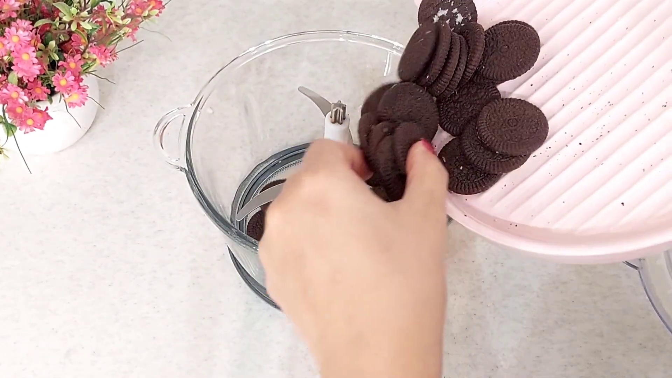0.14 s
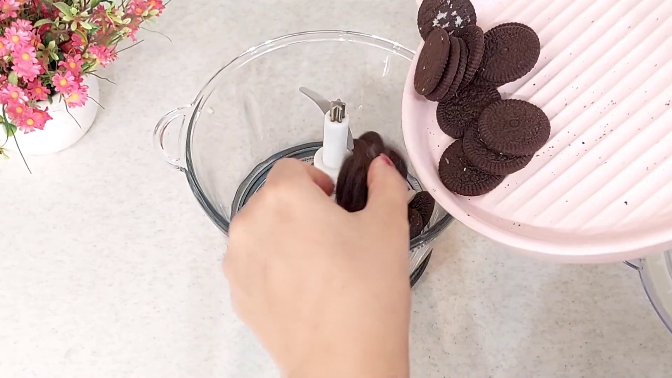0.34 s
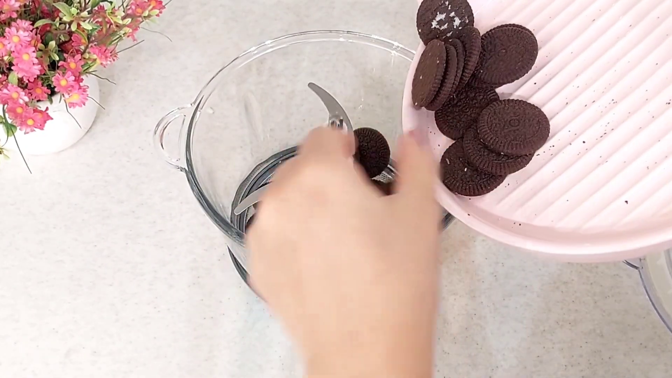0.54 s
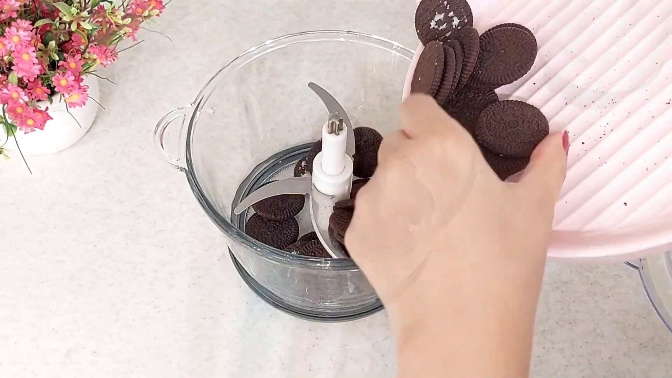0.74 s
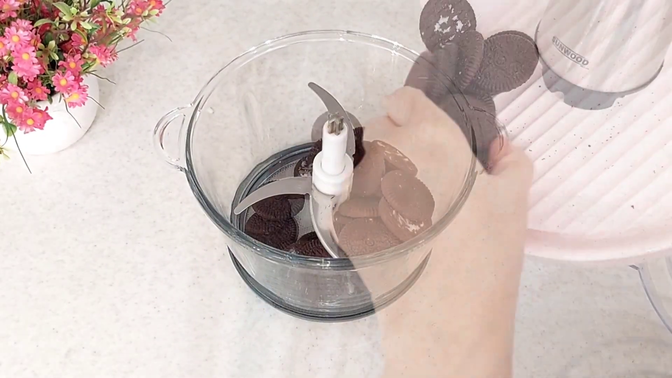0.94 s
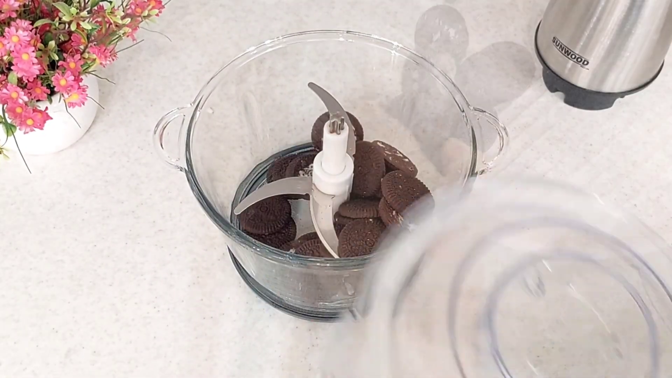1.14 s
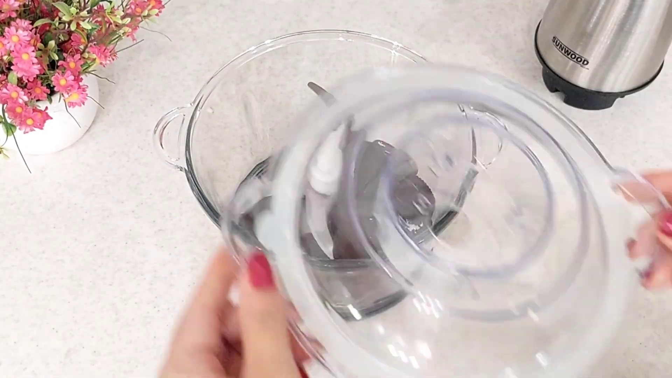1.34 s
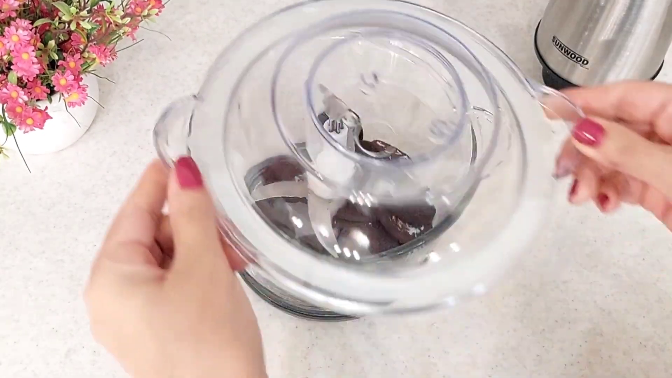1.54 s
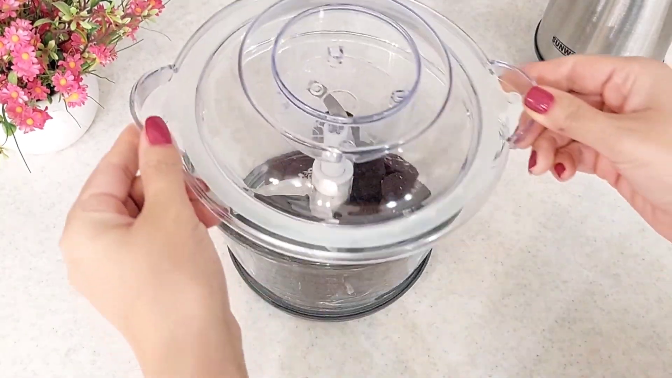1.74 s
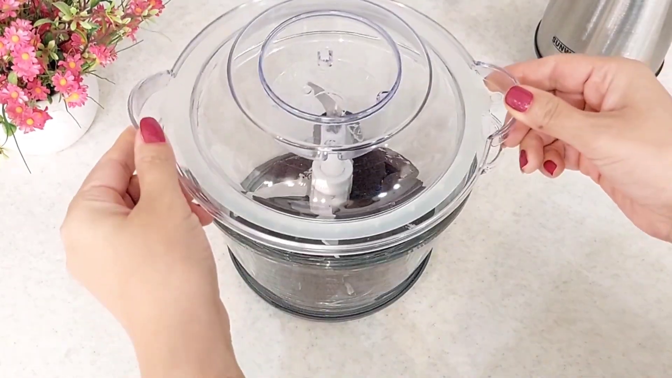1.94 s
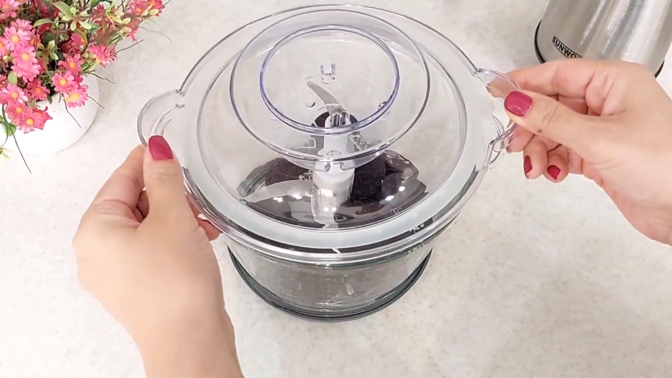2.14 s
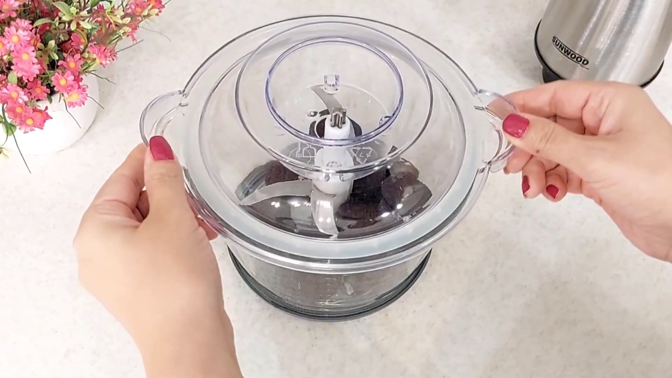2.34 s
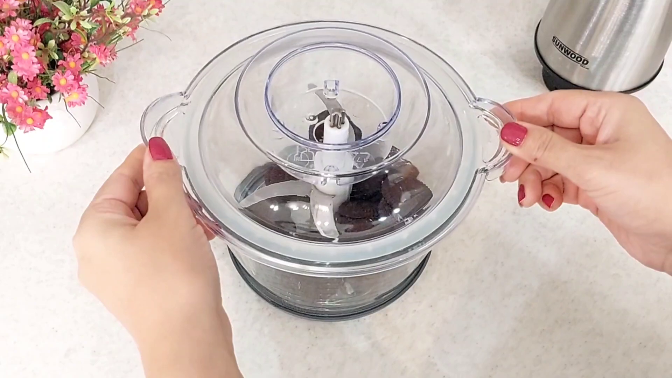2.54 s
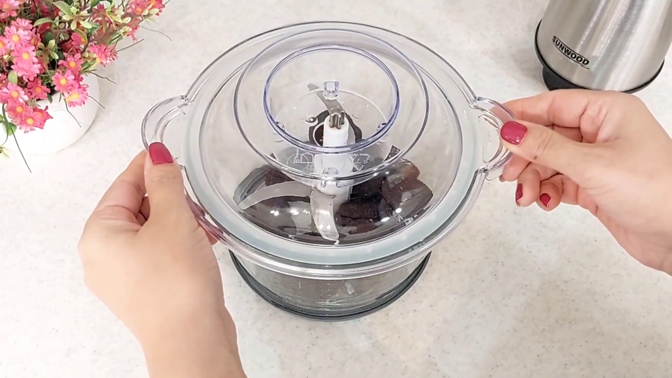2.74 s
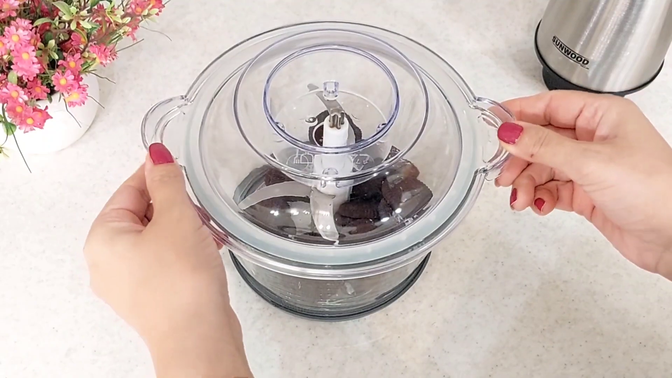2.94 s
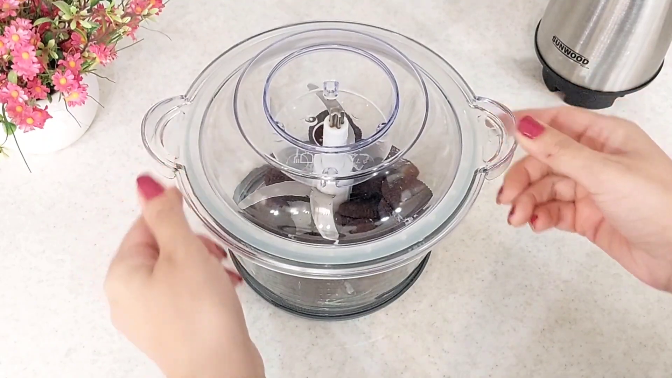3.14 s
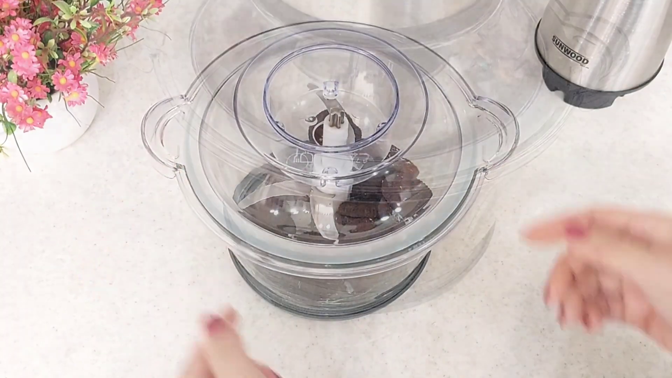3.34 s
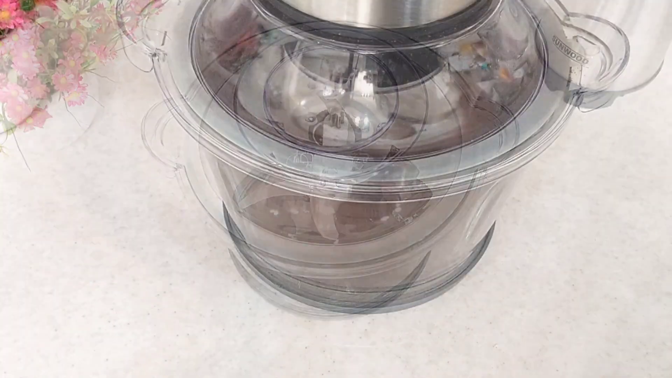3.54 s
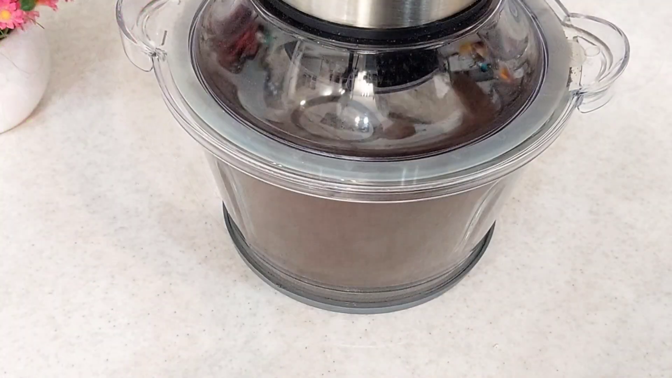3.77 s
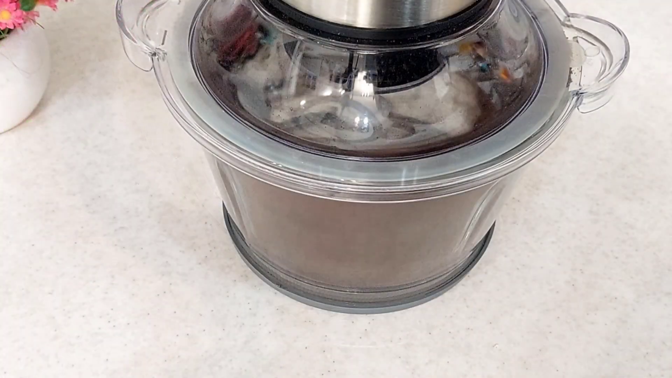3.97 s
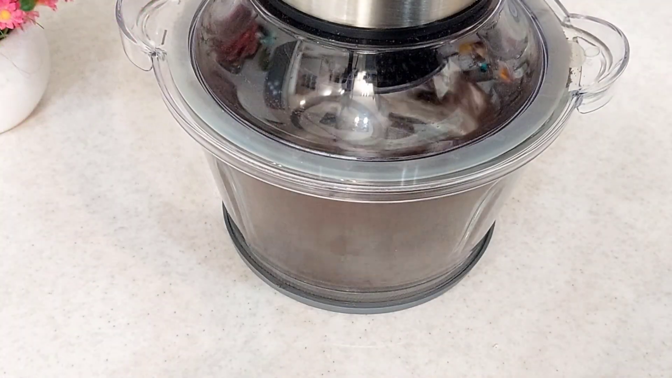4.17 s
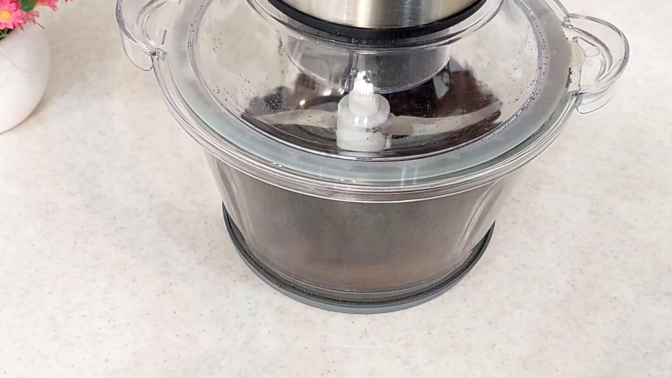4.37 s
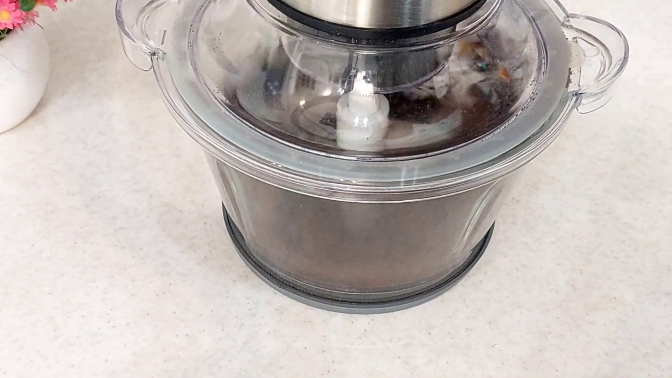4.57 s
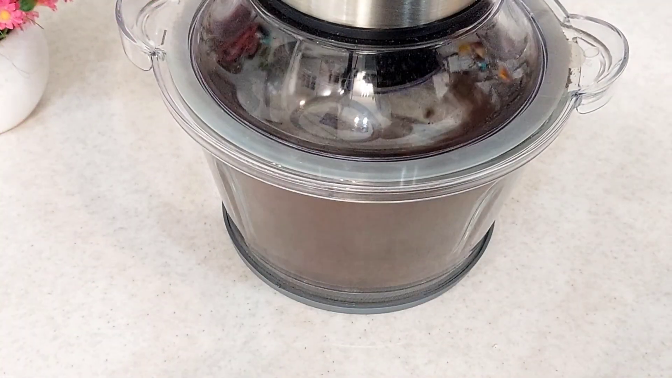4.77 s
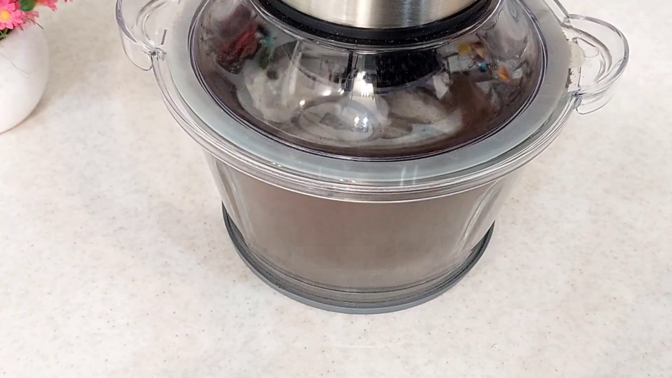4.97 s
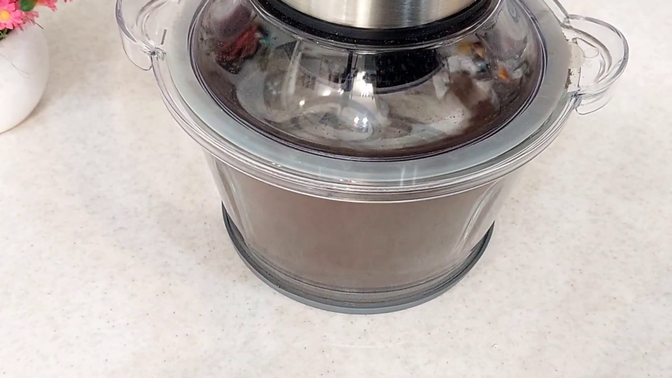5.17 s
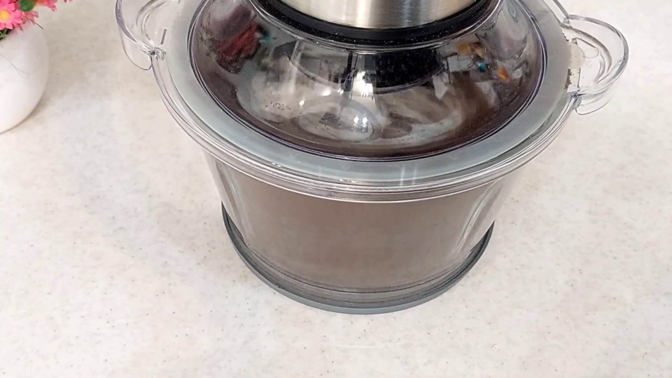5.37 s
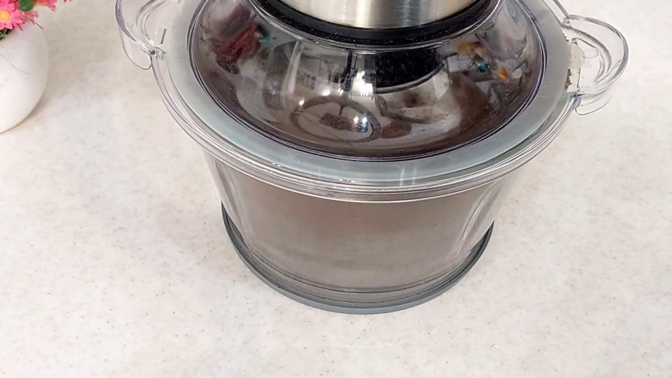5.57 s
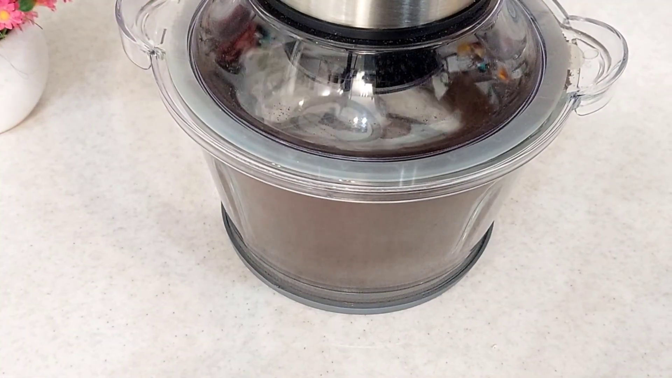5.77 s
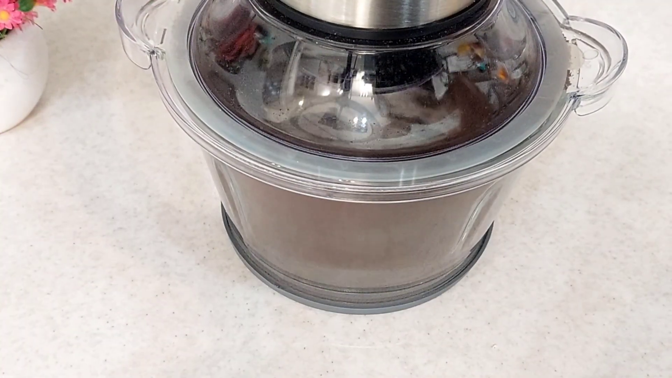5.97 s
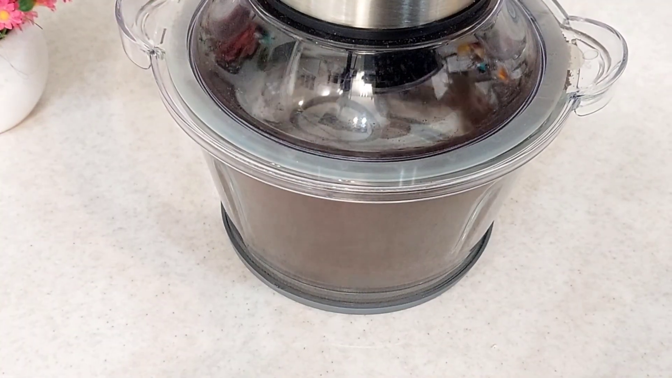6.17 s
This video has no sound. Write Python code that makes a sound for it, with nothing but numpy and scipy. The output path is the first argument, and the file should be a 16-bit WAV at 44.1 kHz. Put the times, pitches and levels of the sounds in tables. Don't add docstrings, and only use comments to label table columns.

```python
import sys
import numpy as np
from scipy import signal
from scipy.fft import rfft, irfft
from scipy.io import wavfile
from scipy.ndimage import uniform_filter1d

SR = 44100
rng = np.random.default_rng(int(sys.argv[2]) if len(sys.argv) > 2 else 0)


def undo_db(level):
    steps = np.asarray(level, float) / 20
    return 10 ** steps


def put_to_file(sound):
    columns = np.atleast_2d(sound).T
    safe = np.clip(columns, -1, 1)
    whole_steps = np.round(safe * 32767)
    wavfile.write(sys.argv[1], SR, whole_steps.astype(np.int16))


N = 273861

# (down [s], up [s], jolt [dB])
PRESSES = [
    (3.244, 4.12, -43),
    (4.586, 6.3, -34),
]


def evened(x):
    return x / np.sqrt(np.mean(x ** 2) + 1e-20)


def read(points, hz):
    f, value = np.transpose(points)
    return np.interp(np.log(hz + 1), np.log(f + 1), value)


def humps_db(modes, hz):
    power = sum(undo_db(db) ** 2 / (1 + (2 * (hz - f) / w) ** 2) ** 2 for f, w, db in modes)
    return 10 * np.log10(power)


def bells_db(modes, hz):
    return sum(db / (1 + (2 * (hz - f) / w) ** 2) for f, w, db in modes)


def onset(t, rise):
    return 1 - np.exp(-t / rise)


def add(mix, s, sound, pan_db):
    part = mix[:, round(s * SR):][:, :sound.shape[-1]]
    sides = undo_db(np.array([[pan_db / 2], [-pan_db / 2]]))
    part += (sides * sound)[:, :part.shape[1]]


def white():
    return rng.standard_normal((2, N))


def flicker(per_s, depth_db):
    slow = uniform_filter1d(rng.standard_normal(N), size=60)
    slow = signal.lfilter([1], [1, -np.exp(-2 * np.pi * per_s / SR)], slow)
    return undo_db(depth_db * evened(slow))


def grains(per_s, spread_db, wash):
    size = undo_db(spread_db * np.minimum(rng.exponential(1, N), 4))
    size = size * (rng.random(N) < per_s / SR)
    return (evened(size) + wash) * white()


def ports(pair, shape_db, size, patchy_db=0., bins=5, frames=8):
    # (frequency [Hz], coherence [0-1])
    likeness = [(60, 0.92), (150, 0.97), (300, 0.96), (640, 0.38), (1400, 0.48), (3100, 0.18), (7000, 0.14),
                (15000, 0.31)]
    # (frequency [Hz], phase [rad])
    lead = [(300, .1), (1400, 0.66), (2500, 2.3), (6600, 14), (13400, 22)]
    # (frequency [Hz], level [dB])
    tilt = [(60, 3.5), (300, -1.5), (1300, 0.5), (3000, 0), (9000, -1.5), (15000, 8)]
    hz, t, z = signal.stft(pair, SR, nperseg=size)
    same = np.clip(read(likeness, hz), -1, 1)[:, None]
    late = np.exp(1j * read(lead, hz))[:, None]
    z = np.array([z[0], same * late * z[0] + np.sqrt(1 - same ** 2) * z[1]])
    side_db = np.array([.5, -.5])[:, None] * read(tilt, hz)
    patches = uniform_filter1d(rng.standard_normal(z.shape[1:]), size=bins, axis=0)
    patches = evened(uniform_filter1d(patches, size=frames, axis=1))
    z *= undo_db((shape_db(hz) + side_db)[..., None] + patchy_db * patches)
    return evened(signal.istft(z, SR, nperseg=size)[1][:, :N])


def puff(t, hz, width, t60):
    b, a = signal.butter(1, np.clip([hz / width, hz * width], 50, 20000), "bandpass", fs=SR)
    noise = evened(signal.lfilter(b, a, rng.standard_normal((2, len(t)))))
    return noise * undo_db(-60 * t / t60)


def note(t, hz, t60, rough, twin=0.32):
    a, b = rng.random((2, 1, 1)) + .3 * rng.random((2, 2, 1))
    pair = np.sin(2 * np.pi * (hz * t + a)) + twin * np.sin(2 * np.pi * (1.025 * hz * t + b))
    return (1 - rough) * pair * undo_db(-60 * t / t60) + rough * puff(t, hz, 1.04, t60)


def kitchen_air():
    # (frequency [Hz], density [dB per Hz])
    air = [(15, -41.5), (25, -19), (108, 6.5), (150, -19.5), (196, -3.5), (258, -7.5), (366, -2),
           (468, -5.5), (897, -23), (1870, -22), (4800, -40), (7300, -32.5), (8400, -40), (15100, -38.5),
           (16300, -52.5)]
    # (frequency [Hz], rms level [dB])
    hum_lines = [(99.5, -85), (199, -71), (293, -79)]
    t = np.arange(N) / SR
    hum = 0
    for hz, db in hum_lines:
        tone = np.sin(2 * np.pi * (hz * t + rng.random()))
        hum = hum + np.sqrt(2) * undo_db(db) * tone * flicker(4, 2.)
    return undo_db(-64) * ports(white(), lambda hz: read(air, hz), size=2048) + hum


def strokes(column):
    # (time [s], hold [s], scuff level [dB], thud level [dB], t60 [s])
    slides = [(0.001, 0.0014, -45.5, -50.5, 0.15), (0.033, 0.37, -52, -53.5, 0.9),
              (0.333, 0.051, -45.5, -43.5, 0.45), (0.449, .005, -32, -35.5, 0.19),
              (0.504, .01, -39.5, -42, 0.3), (0.59, 0.057, -52, -52.5, 0.15),
              (0.685, .003, -44, -45.5, 0.29), (0.863, 0.2, -65, -80, .2), (1.375, 0.043, -59.5, -72, .1),
              (1.026, .005, -57, -62, 0.22), (1.144, .003, -49.5, -54.5, 0.74),
              (1.29, 0.11, -83, -65.5, .1), (1.598, 0.051, -79, -58.5, 0.28),
              (2.02, 0.019, -58, -49.5, 0.37), (2.236, .003, -87, -58.5, 0.77),
              (2.566, 0.028, -80, -59, 1.6), (2.98, .003, -75.5, -70, 0.25),
              (3.044, 0.14, -83.5, -72.5, .1)]
    rise_db_per_s = 1004
    t = np.arange(N) / SR
    power = 0
    for row in slides:
        since, hold, t60 = t - row[0], row[1], row[4]
        rise_db = rise_db_per_s * np.minimum(since, 0)
        fall_db = -60 * np.maximum(since - hold, 0) / t60
        power = power + undo_db(row[column] + rise_db + fall_db) ** 2
    return np.sqrt(power)


def handling():
    # (frequency [Hz], density [dB per Hz])
    scuff_spectrum = [(240, -36.5), (400, 4.5), (744, 3.5), (1220, -7), (1450, 2.5), (2010, -3.5),
                      (3920, -11.5), (4500, -8.5), (5260, -10.5), (8910, -24), (10400, -21), (15100, -21.5),
                      (16300, -40.5)]
    # (frequency [Hz], width [Hz], level [dB])
    rubbed = [(1705, 42, 4), (5260, 440, -6), (11500, 2400, -16.5)]
    # (frequency [Hz], density [dB per Hz])
    thud_spectrum = [(15, -42.5), (25, -18.5), (64, -10), (114, 5.5), (227, -5), (315, 4.5), (502, -3.5),
                     (677, -25.5), (741, -11.5), (900, -19), (1170, -48), (1980, -120)]
    # (time [s], peak [dB], frequency [Hz], t60 [s], rise [s])
    bumps = [
        (.452, -27, 112, 0.24, 0.0077),
        (0.57, -42, 79, 0.22, 0.0049),
        (1.6, -47, 31, 0.8, 0.043),
        (2.683, -33, 103, 0.16, 0.0076),
        (2.54, -49, 100, 0.31, 0.024),
    ]
    grit = grains(3000, 2.5, 1.2) * flicker(20, 1.5)
    scuff = ports(grit, lambda hz: read(scuff_spectrum, hz), size=512, patchy_db=3.)
    scuff += undo_db(-13.5) * ports(white(), lambda hz: humps_db(rubbed, hz), size=1024)
    thud = ports(white(), lambda hz: read(thud_spectrum, hz), size=2048)
    out = undo_db(-1.0) * scuff * strokes(column=2) + undo_db(1.5) * thud * strokes(column=3)
    t = np.arange(SR // 2) / SR
    for s, db, hz, t60, rise in bumps:
        add(out, s, undo_db(db - 60 * t / t60) * np.sin(2 * np.pi * hz * t) * onset(t, rise), 0)
    return out


def biscuits():
    # (time [s], peak [dB], low note [Hz], high note [Hz], t60 [s])
    tumble = [(0.027, -38.5, 1840, 5120, 0.075), (0.04, -33, 1744, 3260, 0.072),
              (0.132, -33.5, 2340, 5210, 0.044), (0.152, -36, 1506, 5310, 0.095),
              (0.195, -32, 3230, 5150, 0.036), (0.23, -40.5, 2300, 5000, 0.037),
              (0.272, -28.5, 2900, 3370, 0.084), (0.289, -30, 2640, 3590, 0.075),
              (0.323, -28, 1690, 5250, 0.026), (0.335, -17, 1510, 5270, 0.024),
              (0.358, -21.5, 2154, 3830, 0.064), (0.393, -25.5, 1380, 5050, 0.044),
              (0.427, -26, 1756, 5190, 0.053), (0.436, -21.5, 2930, 3860, 0.076),
              (0.454, -21.5, 1660, 3660, 0.011), (0.486, -29, 1673, 4070, 0.093),
              (0.51, -32.5, 1480, 4430, 0.06), (0.526, -33, 2300, 3700, 0.043),
              (0.547, -32.5, 1700, 3480, 0.055), (0.597, -38.5, 1860, 4600, 0.054),
              (0.617, -42, 1800, 3320, 0.052), (0.694, -37.5, 2400, 5400, 0.047)]
    # (time [s], peak [dB], low note [Hz], high note [Hz])
    strays = [(0.87, -55, 1640, 5300), (0.97, -55, 1610, 5200), (1.021, -46, 1630, 4490),
              (1.116, -37, 1480, 5260), (1.133, -30.5, 2220, 4730), (1.168, -42, 2410, 5330),
              (1.176, -37.5, 1680, 3360), (1.214, -38, 2460, 3840), (1.238, -42.5, 2190, 4540),
              (1.281, -43.5, 2870, 5400), (1.325, -46, 1430, 5230), (1.367, -46, 2290, 5240),
              (1.374, -44, 1700, 5240), (1.395, -49, 1660, 4750)]
    # (time [s], peak [dB])
    ticks = [(0.0416, -34), (0.131, -32.5), (0.196, -47), (0.272, -32), (.323, -34), (.335, -25),
             (.358, -24), (.394, -30), (.4263, -22), (0.4413, -18), (0.5475, -32), (0.5955, -35),
             (.6794, -38), (.6918, -42), (1.116, -48), (1.1325, -38), (1.214, -38), (1.324, -46),
             (1.874, -63), (4.109, -12), (4.6602, -25), (6.1188, -29)]
    # (time [s], peak [dB], frequency [Hz], t60 [s])
    rings = [(0.033, -46, 2000, 0.3), (0.28, -36.5, 1690, 0.19), (0.4, -55, 1600, 0.84),
             (0.48, -25, 3540, 0.061), (.5, -44, 4230, 0.082), (0.84, -60.5, 1660, 0.21),
             (1.028, -43, 1650, 0.056), (1.028, -47.5, 2250, 0.1), (1.029, -51, 3000, 0.08),
             (1.24, -48, 5600, 0.059), (1.24, -53, 3300, 0.11), (1.407, -49, 1700, 0.16),
             (1.405, -54, 2940, 0.15), (2.222, -39.5, 1940, 0.069), (2.2212, -38, 457, 0.074),
             (2.572, -70.5, 1900, 0.69), (2.572, -61, 1300, 0.093), (0.092, -57, 1400, .5),
             (0.601, -51, 1650, 0.48), (.93, -65, 1675, .4), (3.08, -66, 2030, 0.23),
             (3.258, -53, 5620, 0.11), (4.443, -61, 7000, 0.043), (4.463, -72, 4100, 0.028),
             (4.512, -68, 5620, 0.063), (1.116, -39, 5100, 0.046), (.131, -43, 4300, 0.075),
             (.195, -38, 5150, 0.13), (.335, -18, 5100, 0.034), (0.45, -27.5, 6800, 0.071),
             (2.2, -57, 3050, 0.25), (2.1, -60, 1920, .3), (2.1, -63, 3300, 0.2),
             (.323, -34.5, 12800, 0.028), (.274, -44, 6500, .08), (.03, -46, 5200, .15),
             (.15, -46, 5300, .15), (4.04, -32, 1500, .08), (4.065, -28.5, 1380, .08),
             (2.225, -60, 2700, .1), (2.225, -56, 903, 0.15)]
    stray_t60, tick_t60 = 0.033, .003
    out, t = np.zeros((2, N)), np.arange(4500) / SR
    for s, db, low_hz, high_hz, t60 in tumble + [row + (stray_t60,) for row in strays]:
        crack = undo_db(-4.0) * puff(t, 4000, 3.2, .006) + undo_db(-8.5) * puff(t, 2600, 2.3, t60)
        low = undo_db(-6.0) * note(t, low_hz, t60, 0.97)
        high = undo_db(-5.5) * note(t, high_hz, t60, 0.46)
        add(out, s, undo_db(db) * (crack + low + high) * onset(t, .0001), 1.8 * rng.standard_normal())
    t = np.arange(9000) / SR
    for s, db in ticks:
        add(out, s, undo_db(db) * puff(t[:600], 4500, 6.8, tick_t60), 0)
    fade = np.hanning(2 * len(t))[len(t):]
    for s, db, hz, t60 in rings:
        add(out, s, undo_db(db) * note(t, hz, t60, 0.29, twin=0.18) * onset(t, 0.0026) * fade, 0)
    return out


def lid():
    # (time [s], peak [dB], edge note [dB], hiss [dB], left-right [dB])
    touches = [
        (1.991, -15.5, -24, -14, 0),
        (2.002, -17, -28, -18, -3.5),
        (2.042, -28, 7.5, -6.5, 3),
        (2.07, -40, 7, -16, -3),
        (2.221, -45, -9, -12, -7),
        (2.259, -46, 7.5, 0.5, 0),
    ]
    # (frequency [Hz], level [dB], t60 [s])
    modes = [(463, -3.5, 0.039), (920, -11.5, 0.1), (1896, -1, 0.17), (2240, -5.5, .05), (3337, 4.5, 0.039),
             (3175, -17, 0.19), (8030, -8, 0.07)]
    # (frequency [Hz], level [dB], t60 [s])
    edge_hz, edge_level_db, edge_t60 = (1350, 3.3, 0.06)
    out, t = np.zeros((2, N)), np.arange(12000) / SR
    for s, db, edge_db, hiss_db, pan_db in touches:
        sound = sum(undo_db(d) * note(t, hz, t60, .35, twin=.7) for hz, d, t60 in modes)
        sound += undo_db(edge_level_db + edge_db) * note(t, edge_hz, edge_t60, 0.16)
        sound += undo_db(hiss_db) * puff(t, 2200, 2.4, 0.16)
        add(out, s, undo_db(db - 17) * sound * onset(t, 0.00042), pan_db)
    return out


def chips():
    # (time [s], peak [dB], centre [Hz])
    cracks = [(2.5712, -64, 7450), (2.6876, -59, 5300), (3.0294, -79.5, 5880), (3.2402, -54, 5620),
              (3.254, -52, 4000), (3.2838, -33, 5530), (3.3, -22.5, 3150), (3.5233, -30, 6500),
              (3.9908, -24, 6000), (4.02, -37, 6500), (3.7688, -32, 5550), (4.109, -14.5, 5600),
              (4.582, -41.5, 5700), (4.6384, -24, 5670), (4.6656, -17, 6580), (4.8394, -26, 5660),
              (4.9292, -18, 7690), (5.1268, -19.5, 6440), (5.15, -22, 5650), (5.55, -18, 5670),
              (5.7283, -20, 6300), (4.8269, -23, 2000), (4.99, -31, 6030), (5.0509, -31, 6000),
              (5.083, -27, 6000), (5.1712, -18, 6000), (5.3567, -33, 5740), (5.4012, -23, 6000),
              (5.4549, -28, 6100), (5.538, -23, 6500), (5.8959, -20.5, 5700), (5.9355, -23, 6500),
              (5.9787, -21, 5700), (6.104, -16, 6900), (6.118, -18.5, 7080)]
    out, t = np.zeros((2, N)), np.arange(2000) / SR
    for s, db, hz in cracks:
        add(out, s, undo_db(db - 3.0) * puff(t, hz, 2.6, t60=0.033), 0)
    return out


def churn_db():
    # (time [s], churn [dB], 0 = full)
    curves = [
        [(3.25, -39), (3.305, -7), (3.5, -4), (3.75, -1), (4.19, -0.5), (4.262, -14.5), (4.315, -27.5),
         (4.42, -41), (4.5, -64)],
        [(4.575, -64), (4.6, -20), (4.63, -8.5), (4.642, 1.6), (4.76, 0.5), (5.0, -0.5), (5.6, 0.74),
         (6.21, -1)],
    ]
    t = np.arange(N) / SR
    return np.max([np.interp(t, *np.transpose(rows), -200, -200) for rows in curves], axis=0)


def crumb_storm():
    # (frequency [Hz], density [dB per Hz])
    storm_spectrum = [(180, -48), (300, -3.5), (586, -12), (967, -14.5), (1350, -10), (1520, -15),
                      (1740, -10), (2550, -20.5), (4980, -17.5), (5600, -15.5), (7820, -16.5),
                      (8650, -30.5), (12100, -21), (15300, -32), (16300, -51.5)]
    # (frequency [Hz], width [Hz], lift [dB])
    glass = [(519, 60, 2.5), (807, 44, 8), (1110, 38, 6), (1390, 70, 3.5), (1684, 93, 2.5),
             (2190, 160, 4.5), (2900, 540, 4.5), (3460, 35, 10), (4400, 60, 7), (3440, 150, -6),
             (5840, 180, -10.5), (2370, 64, 1.5), (9000, 500, 1)]
    hits = grains(6000, 0.91, 1.1) * flicker(25, 1.6)
    return ports(hits, lambda hz: read(storm_spectrum, hz) + bells_db(glass, hz),
                 size=1024, patchy_db=3.2, bins=3, frames=12)


def housing_whine():
    # (frequency [Hz], width [Hz], level [dB])
    housing = [(5613, 45, 2), (5748, 70, 1), (5500, 300, -9), (6430, 130, -7), (6590, 75, -2),
               (6910, 60, -8), (7170, 90, -7), (7695, 95, -3.5), (4715, 65, -9)]
    whine = ports(white(), lambda hz: humps_db(housing, hz), size=2048, patchy_db=3., bins=8, frames=2)
    return evened(whine * flicker(40, 2.8))


def counter_rumble():
    # (frequency [Hz], width [Hz], level [dB])
    counter = [(103.6, 25, -2), (131, 30, -1.5), (161, 130, -8.5), (237, 61, -7.5), (293.3, 31, 2),
               (353, 45, -11)]
    return ports(white() * flicker(36, 1.85), lambda hz: humps_db(counter, hz), size=2048)


def chopper():
    # (level at full churn [dB], slope [dB per dB])
    fine = (-31.5, 1.08)
    coarse = (-33, 0.93)
    shake = (-34.5, 0.89)
    whine = (-32, 0.79)
    # (time [s], length [s], grit change [dB], weight change [dB])
    lumps = [(3.328, 0.019, 6, 1), (3.768, 0.012, 4, -5), (4.142, 0.032, -6.5, -1.5),
             (4.17, 0.0093, 4.5, 4), (4.675, 0.031, 4, 0), (4.774, 0.032, -2, -3.5), (4.83, 0.021, -0.5, 6),
             (5.18, 0.16, -0.2, 2), (5.571, 0.026, 2.5, 5.5), (3.818, 0.0087, 0, 3.5),
             (3.927, 0.013, 0.5, 4), (4.2, 0.0069, 2.5, 0), (6.076, .03, 1.5, 1)]
    wind_up_s, slow_db, coast_s, coast_db = 0.18, -23, .015, -11.5
    kick_delay_s, kick_rise_s, kick_t60, kick_crumbs_db = 0.01, 0.0093, 0.5, -1
    wobble_s = 0.019
    whine_per_grit, shake_per_weight = 0.53, 0.96

    storm, housing, rumble = crumb_storm(), housing_whine(), counter_rumble()
    low_storm = signal.sosfiltfilt(signal.butter(2, 2300, fs=SR, output="sos"), storm)
    t, churn = np.arange(N) / SR, churn_db()
    grit, weight = sum(np.outer([g, w], np.exp(-((t - s) / length) ** 2)) for s, length, g, w in lumps)

    speed_db, kick = np.zeros(N), np.zeros(N)
    for (down, up, kick_db), next_down in zip(PRESSES, [PRESSES[1][0], np.inf]):
        since = np.maximum(t - down, 0)
        speed_db += (t > down) * slow_db * np.exp(-(since / wind_up_s) ** 4)
        speed_db += (t < next_down) * coast_db * np.clip((t - up) / coast_s, 0, 1)
        late = np.maximum(since - kick_delay_s, 0)
        kick += undo_db(kick_db - 60 * late / kick_t60) * onset(late, kick_rise_s)

    coarse_gain = undo_db(coarse[0] + coarse[1] * churn + weight)
    out = evened(storm - low_storm) * undo_db(fine[0] + fine[1] * churn + grit)
    out += evened(low_storm) * np.hypot(undo_db(kick_crumbs_db) * kick, coarse_gain)
    out += housing * undo_db(whine[0] + whine[1] * churn + whine_per_grit * grit + speed_db)
    churn = np.maximum(churn, np.interp(t - wobble_s, t, churn))
    shake_gain = undo_db(shake[0] + shake[1] * churn + shake_per_weight * weight)
    return out + rumble * np.hypot(kick, shake_gain)


def after_ring():
    # (frequency [Hz], level [dB], t60 [s])
    modes = [
        (1700, -59.5, 0.43),
        (2900, -61, 0.36),
        (5620, -58, 0.35),
        (7700, -57, 0.29),
    ]
    out, t = np.zeros((2, N)), np.arange(13000) / SR
    add(out, 4.26, sum(undo_db(db) * note(t, hz, t60, 0.34) for hz, db, t60 in modes), 0)
    return out


def room(x):
    # (frequency [Hz], t60 [s])
    decay = [(150, 0.79), (1000, 0.088), (4000, 0.088), (12000, 0.036)]
    taps = np.zeros((2, SR // 2))
    at = np.arange(200, SR // 2 - 20, 20) + rng.integers(0, 20, (2, (SR // 2 - 201) // 20))
    np.put_along_axis(taps, at, rng.choice([-1., 1.], at.shape), axis=1)
    hz, t, z = signal.stft(taps, SR, nperseg=256)
    tail = signal.istft(z * undo_db(-60 * t / read(decay, hz)[:, None]), SR, nperseg=256)[1]
    return signal.fftconvolve(x, tail / np.linalg.norm(tail[0]), axes=1)[:, :N]


def port_colour(x):
    # (frequency [Hz], width [Hz], lift [dB])
    openings = [(8770, 1200, -16.5), (5400, 650, 1), (15520, 2900, -8), (6340, 400, -1.5)]
    hz = np.fft.rfftfreq(N, 1 / SR)
    return irfft(rfft(x) * undo_db(bells_db(openings, hz)), N)


def scene():
    hits = biscuits() + lid() + chips()
    hits = port_colour(hits + undo_db(-9.0) * room(hits))
    since = np.arange(N) / SR - PRESSES[0][0]
    air_gain = undo_db(-5 * np.clip(since, 0, .5) * 2)
    return hits + chopper() + handling() + air_gain * kitchen_air() + after_ring()


def top_cut(x):
    return signal.sosfilt(signal.butter(12, 16480, fs=SR, output="sos"), x)


def record(dry):
    band = signal.sosfilt(signal.butter(2, 45, "highpass", fs=SR, output="sos"), dry)
    low_pass = signal.firwin(511, 16000, window=("kaiser", 9), fs=SR)
    band = signal.oaconvolve(band, low_pass[None], "same", axes=1)
    return top_cut(band)


dry = scene()
out = record(dry)
put_to_file(out)
```